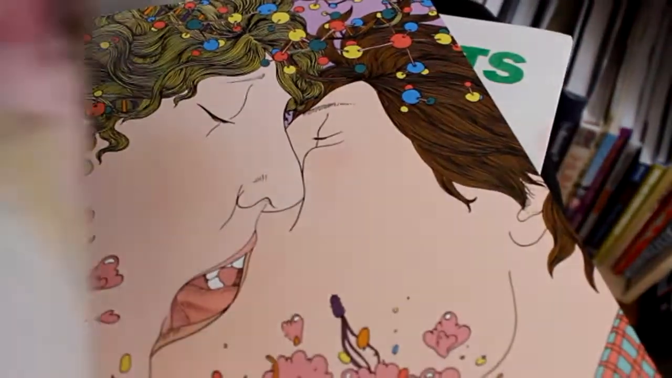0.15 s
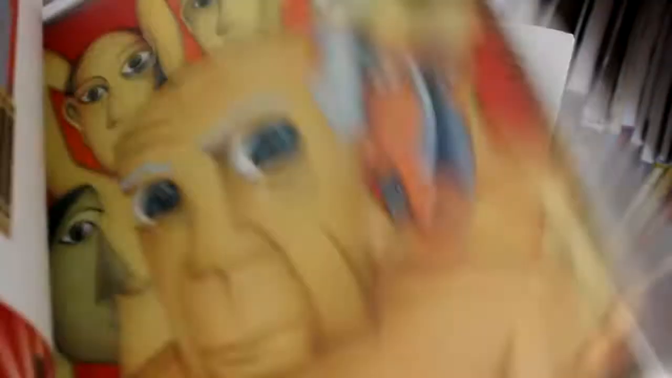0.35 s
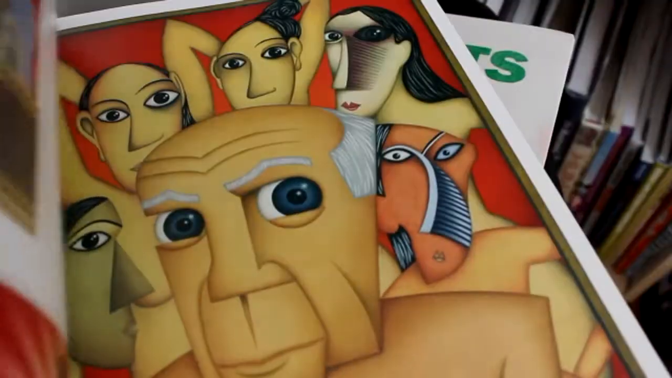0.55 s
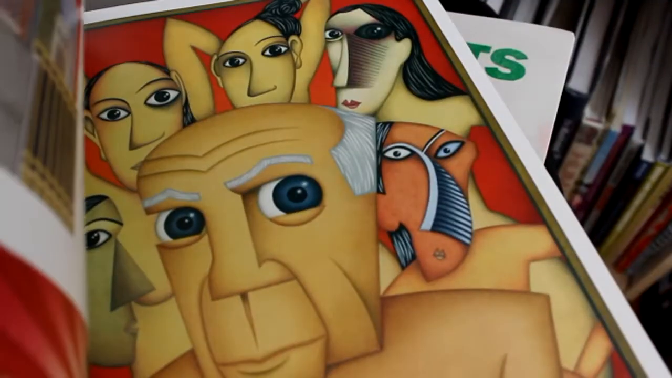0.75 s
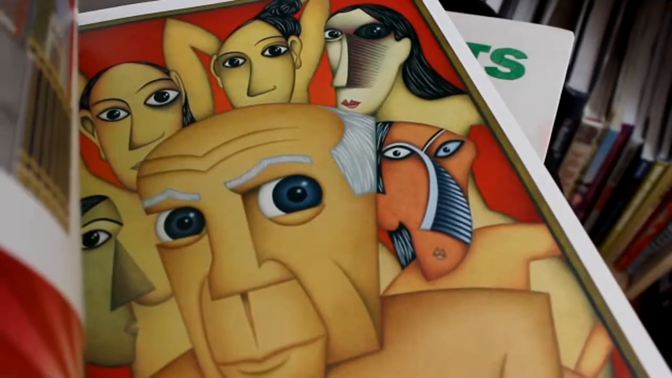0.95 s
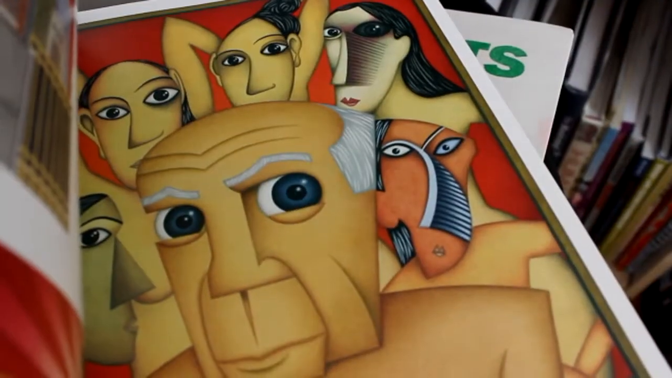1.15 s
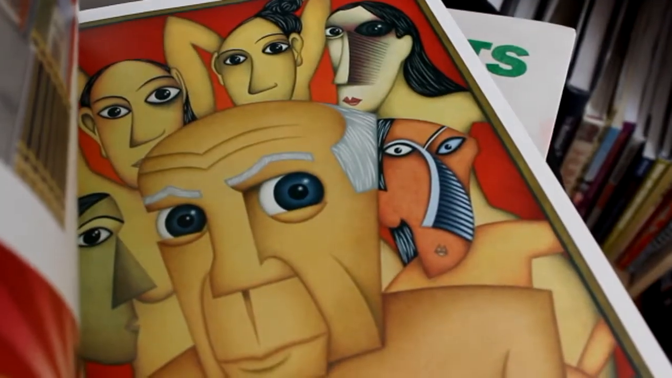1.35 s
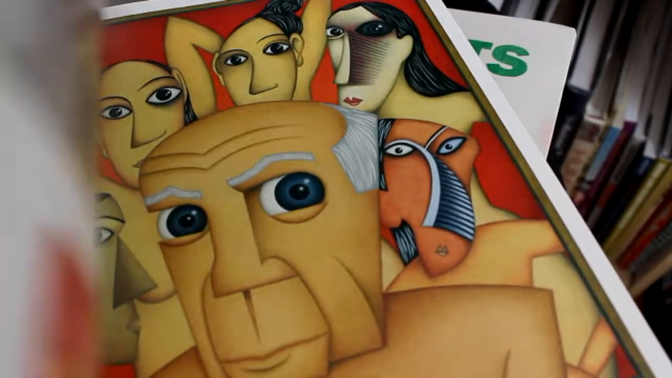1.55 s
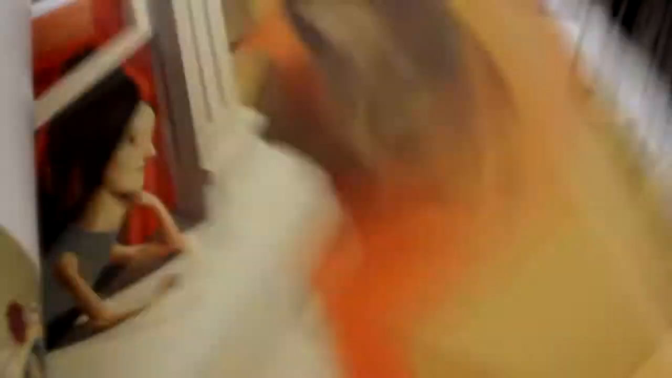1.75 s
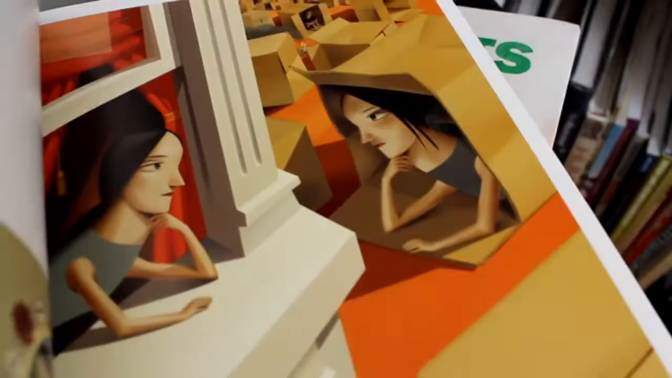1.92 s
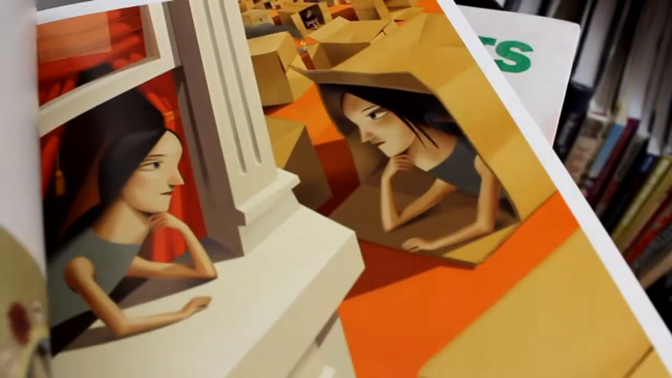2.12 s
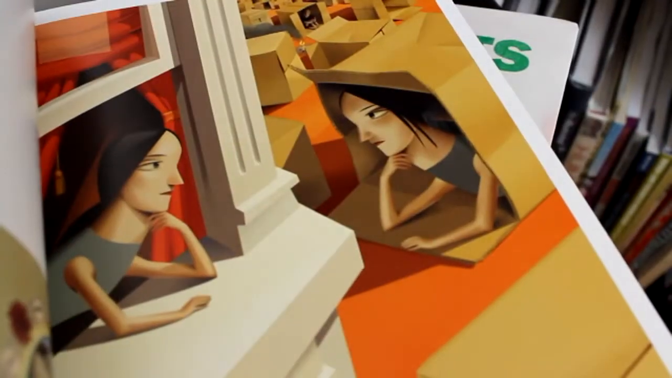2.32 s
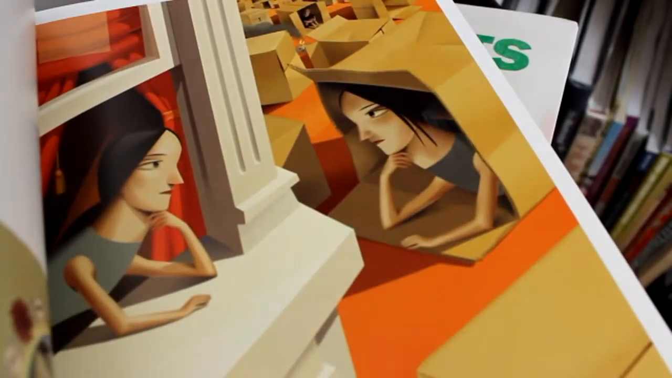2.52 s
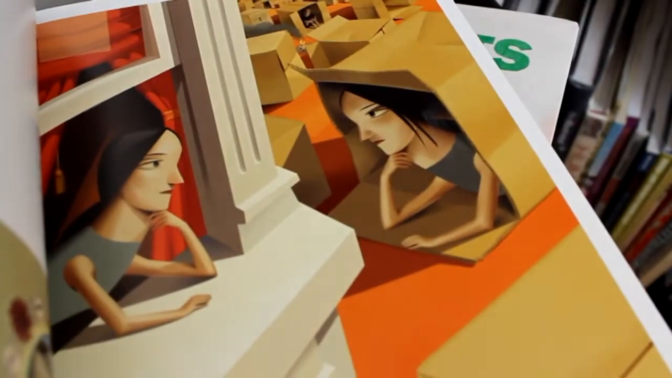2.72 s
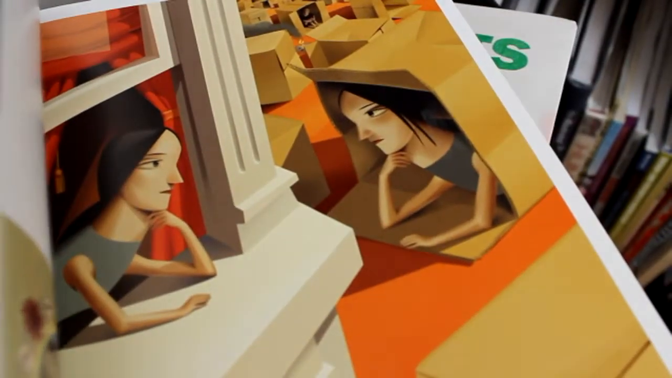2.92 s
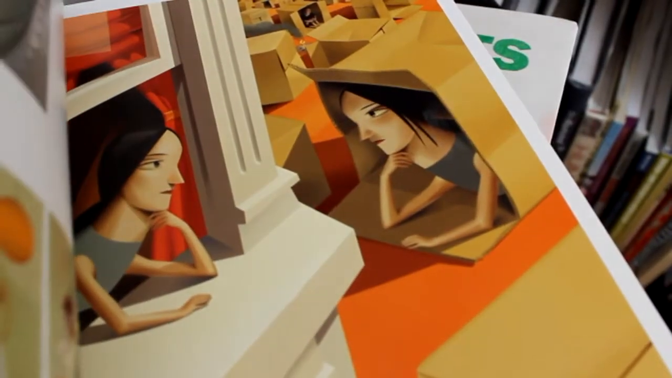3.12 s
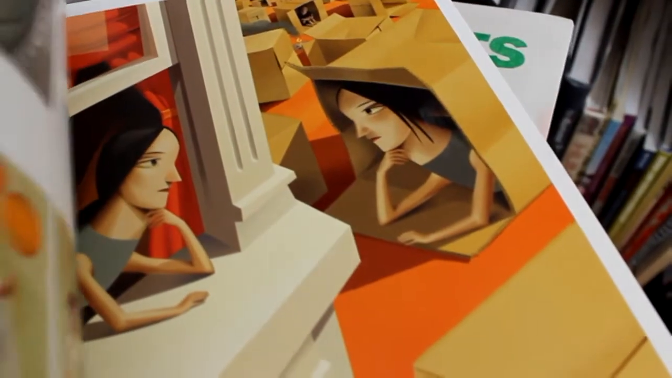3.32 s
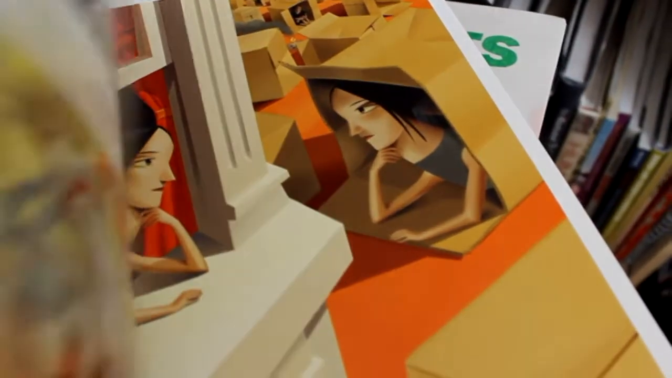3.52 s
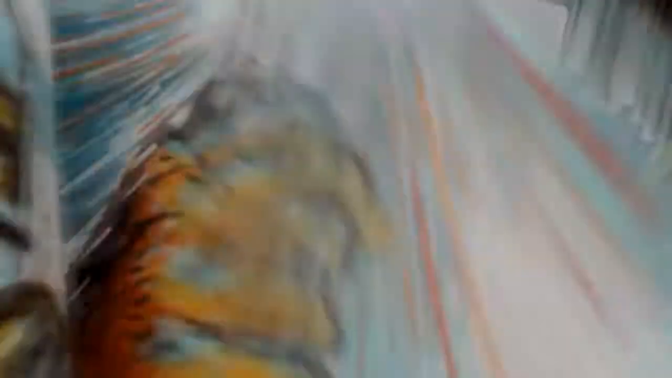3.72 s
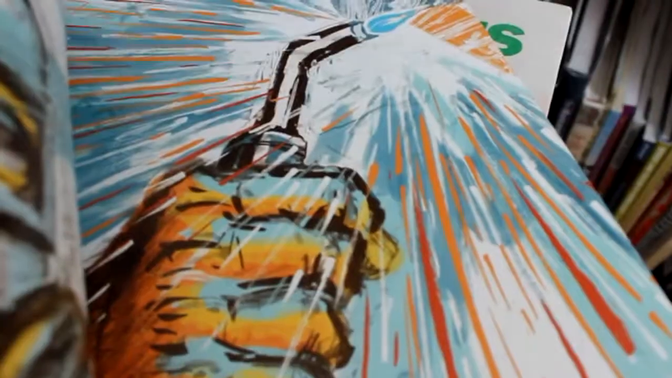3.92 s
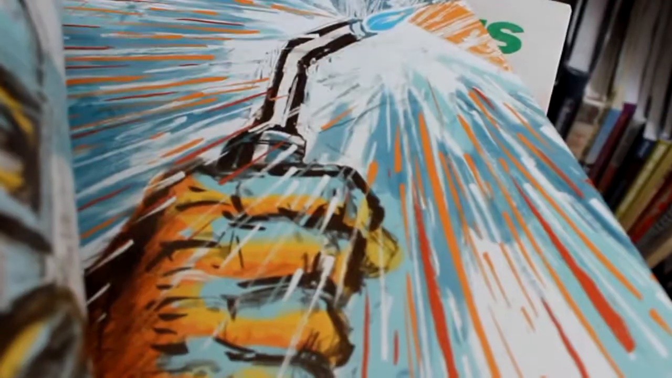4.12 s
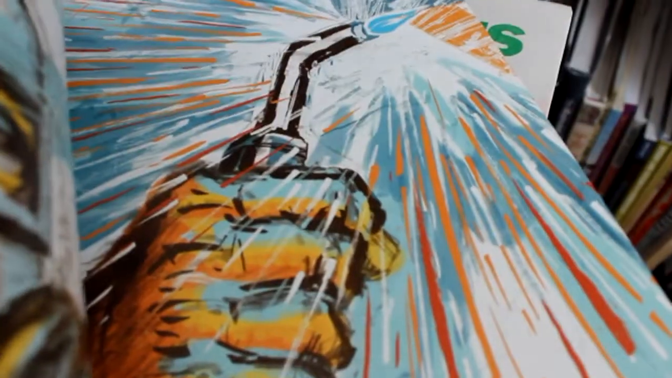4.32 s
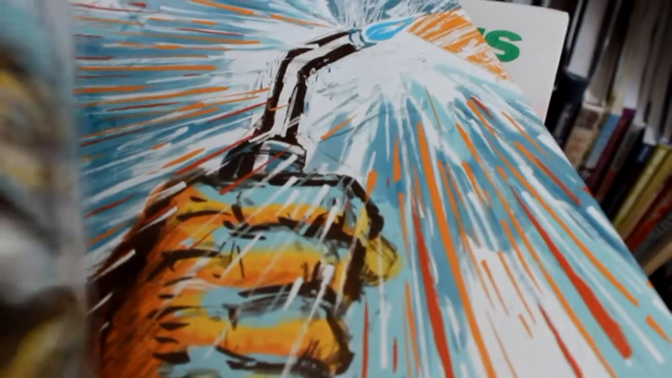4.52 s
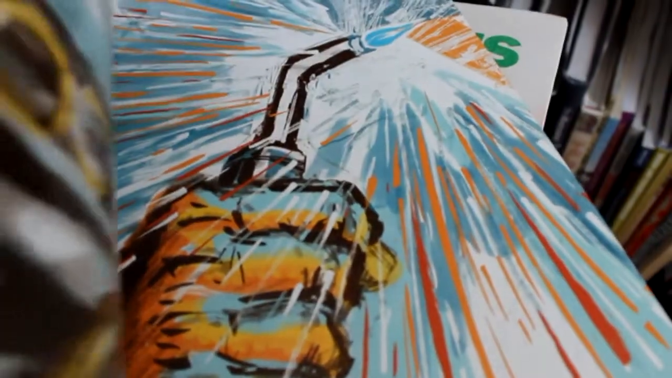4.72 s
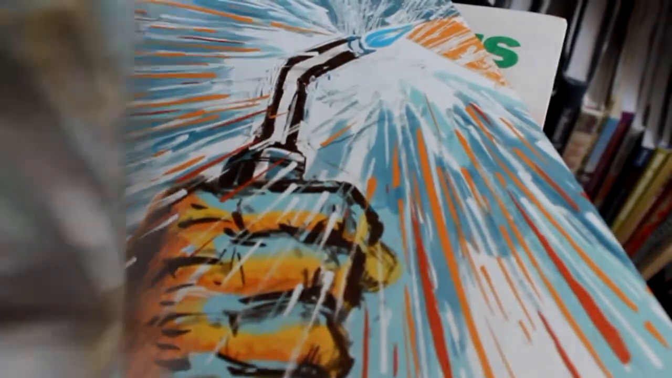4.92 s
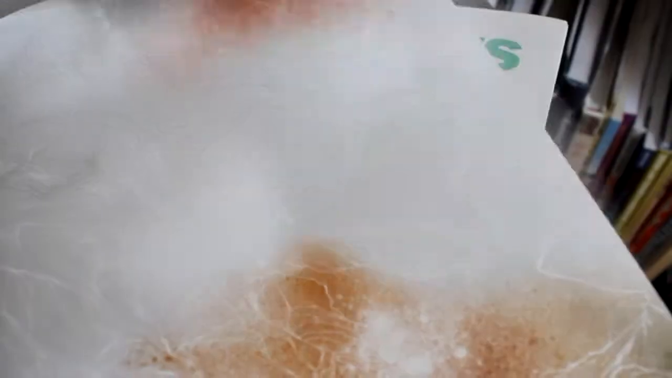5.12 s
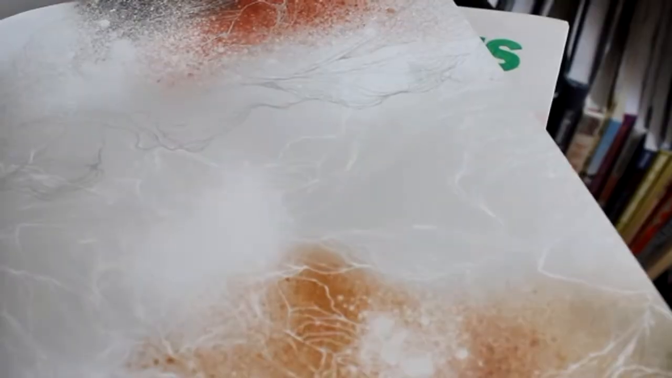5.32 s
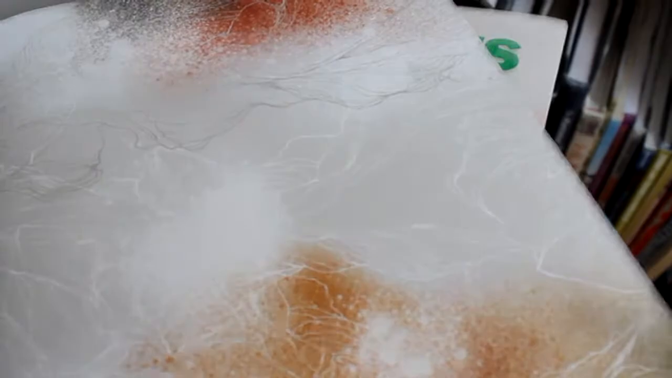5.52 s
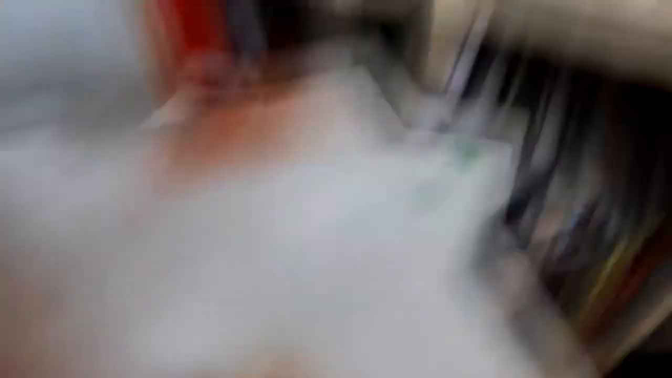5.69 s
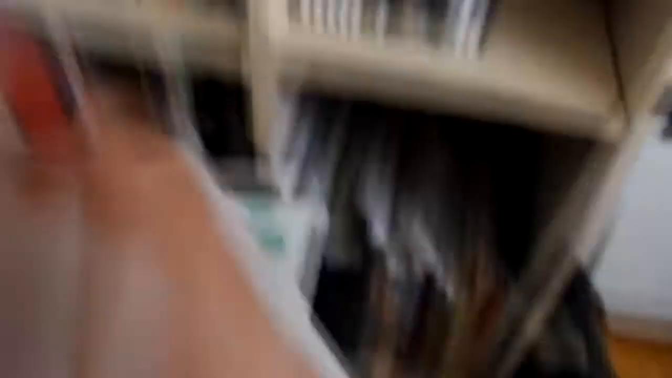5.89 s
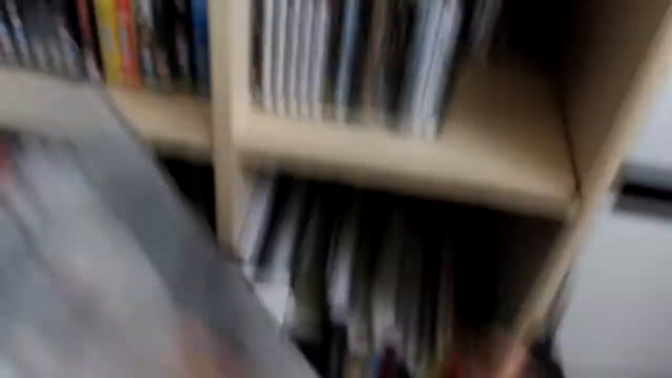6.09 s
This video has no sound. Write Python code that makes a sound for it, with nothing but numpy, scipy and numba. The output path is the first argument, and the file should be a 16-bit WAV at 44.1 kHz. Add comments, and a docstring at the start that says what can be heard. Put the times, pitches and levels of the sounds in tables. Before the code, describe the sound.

Thick glossy pages are turned by hand, about one every second and a half. Each lets go with a sharp crack, slides through the air and lands with a papery flap, with small ticks and finger taps in the pauses. A last flurry of flaps fades into soft rustling. The microphone is close to the book, in a small, quiet room with a low hiss.

```python
"""A quiet room, a small camera's microphone close to a large book whose stiff glossy pages slip off a
thumb one by one. Each page cracks as it lets go, swishes over and flaps down on the pile; fingers tap
and rustle in between. A short room tail and steady hiss lie under it, and the camera's gain control
dips after loud blows."""
import sys
import numpy as np
from scipy import signal
from scipy.fft import rfft, irfft
from scipy.io import wavfile
from scipy.ndimage import uniform_filter1d
from numba import njit

SR = 44100
rng = np.random.default_rng(int(sys.argv[2]) if len(sys.argv) > 2 else 0)


def dump_mix(stems):
    """Bounce the given channels to the path in sys.argv[1] as a 16-bit WAV at rate SR."""
    frames = np.atleast_2d(stems).T  # one column per channel
    limited = np.clip(frames, -1, 1)  # hard clip at full scale
    pcm = np.round(limited * 32767).astype(np.int16)
    wavfile.write(sys.argv[1], SR, pcm)


N = 275666


def undb(db):
    return 10 ** (np.asarray(db) / 20)


def unit_rms(x):
    return x / np.sqrt(np.mean(x ** 2))


def unit_peak(x):
    return x / np.abs(x).max()


def unit_energy(x):
    return x / np.linalg.norm(x)


def ring(x, hz, width_hz):
    """One resonance, gain 1 at its centre."""
    return signal.lfilter(*signal.iirpeak(hz, hz / width_hz, SR), x)


def band(x, lo_hz, hi_hz):
    return signal.sosfilt(signal.butter(2, [lo_hz, hi_hz], "band", fs=SR, output="sos"), x)


def add(track, start_s, x):
    i = int(start_s * SR)
    track[i:i + len(x)] += x[:N - i]


def grit(shape, spread_db=1.8):
    """Dense stick-slip grains of uneven size."""
    return undb(spread_db * rng.exponential(size=shape)) * rng.standard_normal(shape)


@njit
def sweep(x, hz, width):
    """State-variable band-pass whose centre moves every sample; width is a share of the centre."""
    y, band_state, low_state = np.empty(len(x)), 0., 0.
    for i in range(len(x)):
        g = np.tan(np.pi * hz[i] / SR)
        passed = (band_state + g * (x[i] - low_state)) / (1 + g * (g + width))
        band_state = 2 * passed - band_state
        low_state += 2 * g * passed
        y[i] = width * passed
    return y


@njit
def follow(x, attack_s, release_s):
    """Peak follower, quick up and slow down."""
    y, level = np.empty(len(x)), 0.
    for i in range(len(x)):
        lag_s = attack_s if abs(x[i]) > level else release_s
        level += (abs(x[i]) - level) / (lag_s * SR)
        y[i] = level
    return y


def hiss(level_db=-54.5):
    """Steady noise of the room and the microphone."""
    # noise floor spectrum: f/Hz, relative density/dB
    spectrum = [(20, 6), (40, -6), (62, 6.5), (82, -7.5), (125, -3.5), (250, -3.5), (500, -3), (1000, -4),
                (2000, -7.5), (4000, -10), (8000, -14), (13000, -17.5), (17000, -13.5)]
    hz, db = np.transpose(spectrum)
    bins_hz = np.fft.rfftfreq(N, 1 / SR)
    gain = undb(np.interp(np.log(bins_hz + 1), np.log(hz), db))
    return unit_rms(irfft(rfft(rng.standard_normal(N)) * gain, N)) * undb(level_db)


def rustle():
    """Fingers shift the pile: a dull papery stir and a low rumble, each wavering on its own."""
    # handling noise, one curve for each page: t/s, stir/dB, rumble/dB
    curves = [
        [(0, -68, -68), (.16, -55.5, -79), (.4, -52.5, -49), (.46, -52, -55), (.6, -51.5, -68),
         (.83, -60.5, -80), (1.2, -83, -77)],
        [(1.45, -63, -74), (1.566, -50.5, -81), (1.688, -53.5, -64), (1.786, -40, -57), (1.826, -57, -54),
         (1.886, -37.5, -58), (2.022, -48, -53), (2.104, -59.5, -71), (2.45, -66, -75)],
        [(2.85, -66, -73), (2.972, -54, -64), (3.206, -52.5, -59.5), (3.362, -57.5, -70), (3.5, -46, -51),
         (3.624, -48.5, -69), (3.734, -27, -39), (3.796, -57, -45), (3.858, -34, -61), (4.014, -56.5, -69),
         (4.3, -61, -81)],
        [(4.3, -62, -72), (4.87, -62.5, -70), (4.964, -48.5, -57), (5.086, -40.5, -51), (5.142, -56, -42),
         (5.284, -56, -52), (5.4, -67, -76)],
        [(5.58, -66, -73), (5.678, -55.5, -62), (5.818, -44.5, -53), (5.91, -42, -38), (6.116, -58.5, -61.5),
         (6.25, -48, -36.5)],
    ]
    out, t = np.zeros(N), np.arange(N) / SR
    for column, lo_hz, hi_hz in [(1, 344, 1710), (2, 28, 206)]:
        gain = sum(undb(np.interp(t, c[:, 0], c[:, column], -200, -200)) for c in map(np.array, curves))
        waver = undb(3 * unit_rms(band(rng.standard_normal(N), 26, 77)))
        friction = unit_rms(waver * band(grit(N), lo_hz, hi_hz))
        out += uniform_filter1d(gain, size=300) * friction
    return out


def swishes():
    """Gritty hiss through the narrowing gap between two sheets, swelling and fading."""
    # paper or skin sliding on the glossy face:
    # t/s, level/dB, starting f/Hz, width/centre, rise/s, length after the rise/s
    slides = [(.047, -58, 1500, .89, .025, .056), (.186, -47.5, 6000, 2.3, .033, 0.013),
              (.306, -42, 5960, 1.3, 0.0073, .009), (.328, -41.5, 5600, 1.6, .0017, .056),
              (0.454, -37.5, 4460, 2.1, .004, 0.016), (.681, -51.5, 3430, 2.2, 0.013, 0.09),
              (.814, -54.5, 10300, 1.3, .005, .093), (.822, -52.5, 1710, 0.7, 0.025, 0.06),
              (1.079, -57, 1980, .87, 0.02, .065), (1.544, -53, 7600, .4, 0.085, 0.044),
              (1.597, -43.5, 2300, 1.9, 0.04, 0.022), (1.724, -40, 7000, 1.9, 0.005, 0.011),
              (1.743, -40.5, 7500, 1.1, 0.0056, 0.068), (1.752, -35, 4030, 0.21, 0.0035, 0.037),
              (1.878, -41, 3980, 2.7, .0026, .013), (1.898, -39.5, 3400, 1.24, 0.0047, .024),
              (2.179, -63, 1270, 0.93, .02, .072), (2.302, -60, 2600, 1.5, 0.026, 0.038),
              (2.911, -61, 1600, 0.37, 0.049, .27), (3.246, -50.5, 4200, 1.4, 0.0062, 0.028),
              (3.415, -47.5, 2600, 2.3, 0.025, 0.046), (3.471, -42.5, 7300, 7.5, 0.02, 0.015),
              (3.566, -43.5, 5300, 1.7, .014, .038), (3.608, -42.5, 5170, 0.84, 0.048, 0.077),
              (3.633, -46, 8400, 2.1, 0.054, 0.037), (3.693, -39, 6300, 1.5, 0.0045, 0.093),
              (3.793, -45, 5000, 2.8, 0.049, .03), (3.848, -40, 4000, 0.96, 0.0027, 0.0084),
              (3.887, -51, 3000, 0.44, .004, .15), (4.14, -51.5, 4180, 3.4, 0.033, 0.031),
              (4.41, -56.5, 4700, 2.5, .02, .036), (4.633, -53, 5300, 3.5, 0.0067, .06),
              (4.933, -46, 4200, 3.1, 0.054, 0.016), (5.004, -47, 2000, 2.7, 0.018, .02),
              (5.041, -39, 5740, 2.2, .004, .074), (5.184, -43.5, 4640, 1.4, .0035, 0.012),
              (5.204, -52, 5300, 1, .0046, 0.042), (5.7, -48, 7400, 2.4, 0.018, 0.083),
              (5.785, -24.5, 2070, 1.8, 0.0024, .017), (5.797, -43.5, 5300, 2.8, .012, 0.098),
              (5.884, -17, 1950, 0.5, 0.0028, 0.014), (5.888, -41.5, 4740, 1.8, .0091, .11),
              (5.926, -50, 11500, .68, .006, 0.076), (6.101, -56, 7140, 0.7, .015, 0.29),
              (6.114, -57, 3200, 1.5, 0.036, 0.16)]
    hold, sag = 0.44, 0.72  # share of the length held; last pitch over first
    out, t = np.zeros(N), np.arange(SR // 2) / SR
    for (start, db, first_hz, width, rise, length), grains in zip(slides, grit((len(slides), len(t)))):
        hz = np.interp(t, [0, rise + length], [first_hz, sag * first_hz])
        swell = np.interp(t, [0, rise, rise + hold * length, rise + length], [0, 1, 1, 0]) ** 1.2
        patchy = undb(2.8 * unit_rms(band(grains[::-1], 32, 113)))  # contact comes and goes
        friction = unit_rms(sweep(sweep(grains, hz, width), hz, width))
        add(out, start, undb(db) * swell * patchy * friction)
    return signal.lfilter(*signal.butter(1, 8000, fs=SR), out)  # coated paper is smooth: little top


def flaps():
    """A burst of flutter rings each sheet round its pitch, coloured by the book; the pushed air thumps."""
    # sheet bending or slapping air: t/s, level/dB, f/Hz, thump against the sheet/dB, t60/s
    slaps = [(.207, -39, 1520, -37, 0.072), (.24, -41.5, 710, -12, 0.17), (.307, -33, 990, -8, .094),
             (.323, -10.5, 1310, -13.5, 0.043), (0.417, -40, 308, -16, 0.055),
             (0.444, -20.5, 340, -13, .11), (.449, -14.5, 776, -21, 0.062), (.46, -14, 765, -27, 0.052),
             (.47, -8.5, 720, -22, 0.063), (0.484, -28.5, 780, -3, 0.074), (0.807, -37.5, 1530, -36, 0.038),
             (1.598, -40.5, 1000, -21, 0.22), (1.636, -34, 1330, -28, 0.032), (1.649, -41, 684, -11, 0.07),
             (1.674, -41, 854, -36, 0.058), (1.725, -37, 1420, -24, 0.027),
             (1.746, -13.5, 1050, -18.5, 0.033), (1.775, -29.5, 1660, -14, .03),
             (1.824, -33, 371, -12, .055), (1.844, -26.5, 360, -19, 0.073), (1.868, -26, 805, -10, .092),
             (1.878, -16.5, 830, -10, 0.14), (1.901, -18.5, 357, -17, 0.13), (1.904, -8.5, 750, -26, 0.044),
             (2.33, -47.5, 705, -26, .05), (3.25, -39.5, 626, -32, .055), (3.441, -42.5, 2180, -24, .051),
             (3.576, -37, 2210, -11.5, 0.12), (3.647, -44, 785, 5, 0.047), (3.697, -21.5, 1230, -12, 0.02),
             (3.757, -31, 1170, -11, 0.042), (3.794, -30.5, 400, -31, 0.028), (3.804, -28, 547, -11, 0.047),
             (3.849, -23, 1160, -2, 0.039), (3.857, -25, 1130, -6, 0.12), (3.864, -15, 780, -14, .028),
             (3.871, -22.5, 2330, -29, 0.0099), (3.876, -15, 930, -13, 0.013),
             (4.555, -43.5, 850, -34, 0.08), (4.677, -46, 700, -20, 0.13), (4.909, -52, 816, -29, .08),
             (4.98, -45, 1960, -10, 0.05), (5.032, -10.5, 914, -10.5, 0.025),
             (5.061, -35, 1300, -17, 0.084), (5.142, -34.5, 774, -6, 0.045),
             (5.188, -18.5, 820, -10.5, .11), (5.212, -20.5, 746, -22, 0.034),
             (5.653, -48.5, 295, -7, 0.054), (5.777, -29.5, 476, -15, 0.035),
             (5.785, -11.5, 890, -6.5, 0.026), (5.848, -34, 420, -12, .055), (5.885, -15, 694, -5, 0.044),
             (6.11, -43, 330, -13, 0.091), (6.144, -42.5, 1050, -28, .072), (6.2, -49, 1180, -7, .05),
             (6.208, -56.5, 275, 12, .043), (6.232, -57, 250, 10, .04)]
    # resonances of the book: f/Hz, width/Hz, gain/dB
    book_modes = [(301, 246, 13.5), (780, 60, 8.5), (970, 120, 2), (1460, 640, 3), (2040, 270, -8)]
    rise_s, hold_s, breadth = 0.0027, 0.0063, 1.224  # breadth as a ratio to pitch
    out, t = np.zeros(N), np.arange(12000) / SR
    for start, db, hz, thump_db, t60 in slaps:
        sheet_noise, air_noise = rng.standard_normal((2, len(t)))
        fade = undb(-60 * np.maximum(t - rise_s - hold_s, 0) / t60)
        burst = np.clip(t / rise_s, 0, 1) ** 2 * fade
        flutter = band(sheet_noise * burst, hz / (1 + breadth), hz * (1 + breadth))
        sheet = ring(ring(flutter, hz, 0.66 * breadth * hz), hz, 9.4 * hz)
        book = sum(undb(gain_db) * ring(sheet, f, width) for f, width, gain_db in book_modes)
        thump = undb(thump_db) * unit_energy(band(air_noise * burst, 82, 296))
        add(out, start, undb(db) * np.linalg.norm(burst) * (unit_energy(sheet + book) + thump))
    return out


def page_edge(push, hz, treble_db):
    """The stiff edge rings for a few cycles, with a band of treble on top."""
    return ring(ring(push, hz, 0.32 * hz), hz, hz) + undb(treble_db) * band(push, 5100, 14400)


def cracks():
    """A sharp tick rings the page edge as it lets go, then a short hiss."""
    # page edge or crease snapping: t/s, peak/dB, ring f/Hz, treble/dB
    snaps = [(0.2195, -26, 2590, -22), (0.3132, -24, 2490, -14), (0.3237, -5.5, 3300, -8.5),
             (.4936, -28, 3100, -22), (0.8137, -19, 9000, -24), (1.5453, -34, 3150, -17),
             (1.6452, -22, 5700, -18), (1.7478, 5.5, 3000, -30), (1.7793, -18, 3770, -19),
             (2.536, -34, 4930, -18), (2.676, -31, 7900, -17), (3.0011, -31.5, 4040, -21),
             (3.2554, -38, 3770, -21), (3.2995, -33.5, 3680, -29), (3.3588, -31.5, 3300, -37),
             (3.4418, -34, 3380, -14), (3.668, -23.5, 4700, -12), (3.7, -9, 3430, -14),
             (3.722, -23, 3650, -16), (3.753, -21.5, 2870, -16), (3.8725, 2, 2840, -36.5),
             (4.5554, -33, 2530, -22), (4.5933, -36, 2780, -23), (4.9845, -24.5, 2790, -25),
             (5.0335, -2, 3080, -7.5), (5.2734, -31.5, 8640, -18), (5.624, -31, 6460, -1),
             (5.7068, -25.5, 2400, -13), (5.7118, -27, 8750, -18), (5.733, -30, 3380, -13.5),
             (5.753, -31, 3000, -22), (5.8286, -27, 5040, -12), (5.88, -21, 7500, -18),
             (5.8864, -15.5, 2420, -19), (5.907, -24, 3350, -20), (5.925, -20.5, 2980, -9),
             (6.084, -37, 6300, -11), (6.1615, -35, 2570, -23), (6.195, -31, 3580, -20),
             (6.2257, -35, 4830, -13)]
    tail_db, tail_t60_s, tail_rise_s = -17.5, 0.034, 0.0021
    tick_delay_s = 0.001  # the tick lands a moment after each listed time
    out, t = np.zeros(N), np.arange(6000) / SR
    tail_shape = undb(tail_db - 60 * t / tail_t60_s) * np.clip(t / tail_rise_s, 0, 1)
    for start, db, hz, treble_db in snaps:
        tick_noise, tail_noise = rng.standard_normal((2, len(t)))
        push = 2.12 * (t == 0) + 1.57 * tick_noise * np.exp(-t / 0.000067)
        tick = unit_peak(page_edge(push, hz, treble_db))
        tail = unit_rms(page_edge(tail_noise, hz, treble_db)) * tail_shape
        add(out, start + tick_delay_s, undb(db) * (tick + tail))
    return out


def taps():
    """One push gives a dull click and rings a damped mode of the pile and a higher neighbour."""
    # fingertip or page corner on the pile: t/s, level/dB, f/Hz
    touches = [(.808, -29, 1650), (1.511, -30, 970), (1.674, -26, 856), (2.672, -35.5, 1400),
               (3.117, -27.5, 340), (3.165, -31.5, 320), (3.248, -40, 690), (3.255, -47, 583),
               (3.265, -35, 804), (3.268, -35, 530), (3.296, -33.5, 765), (3.302, -36, 630),
               (3.359, -32.5, 740), (3.503, -39.5, 278), (4.552, -27.5, 904), (4.672, -31.5, 760),
               (4.712, -33.5, 910), (4.774, -42.5, 940), (4.902, -35, 800), (4.934, -35.5, 780),
               (5.613, -41, 308), (5.623, -36.5, 614), (5.705, -35.5, 1460), (5.739, -33.5, 250),
               (5.749, -35, 328)]
    t60_s, click_db = 0.022, -4.5
    flatten_s = 0.0035  # soft skin flattens before the pile answers
    out, t = np.zeros(N), np.arange(4000) / SR
    fade = undb(-60 * t / t60_s)
    click = undb(click_db) * np.exp(-0.5 * ((t - 0.0003) / 0.00009) ** 2)
    for start, db, hz in touches:
        upper_hz, phase = hz * rng.uniform(1.77, 2.33), rng.uniform()
        upper = 0.5 * fade * np.sin(2 * np.pi * (upper_hz * t + phase))
        body = unit_peak(fade * (np.sin(2 * np.pi * hz * t) + upper))
        add(out, start + flatten_s, undb(db) * (body + click))
    return out


def room(direct):
    """A small furnished room returns a dense tail, 4 ms behind the direct sound."""
    # ranges of the tail: f/Hz, width/Hz, level/dB, t60/s
    ranges = [(740, 800, -28.5, 0.4), (1210, 4500, -26, 0.16), (3350, 3200, -27, .24)]
    response, t = 0, np.arange(SR // 2) / SR
    for hz, width, db, t60 in ranges:
        tail = ring(rng.standard_normal(len(t)), hz, width) * undb(-60 * t / t60) * (t > 0.004)
        response += undb(db) * unit_energy(tail)
    return signal.fftconvolve(direct, response)[:N]


def scene():
    """One microphone, close to the book, with the room faint behind it."""
    book = cracks() + flaps() + taps() + swishes() + rustle()
    return (book + room(book) + hiss())[None]


def record(dry):
    """The camera turns down after loud blows; its converter sits a little off zero; the top is cut."""
    threshold_db, ratio, dc_offset, top_hz = -32.5, 1.218, 0.001, 16000
    level = follow(dry[0], attack_s=0.027, release_s=0.15)
    gain = np.minimum(undb(threshold_db) / (level + 1e-9), 1) ** (1 - 1 / ratio)
    converted = np.clip(dry * gain + dc_offset, -1, 1)
    return signal.sosfilt(signal.ellip(14, 0.2, 95, top_hz, fs=SR, output="sos"), converted)


dry = scene()
out = record(dry)
dump_mix(out)
```